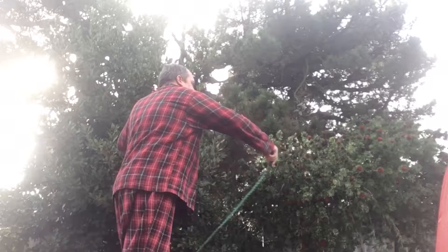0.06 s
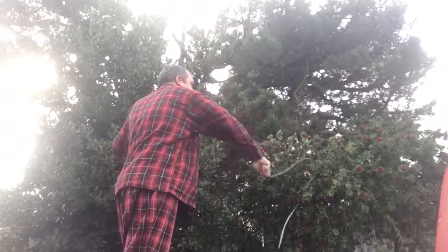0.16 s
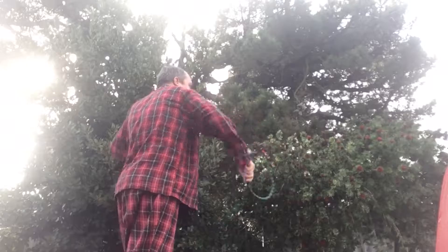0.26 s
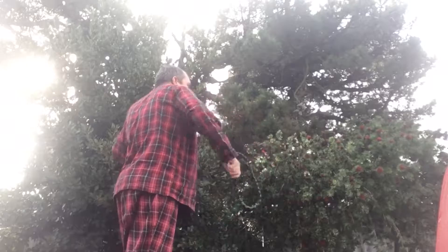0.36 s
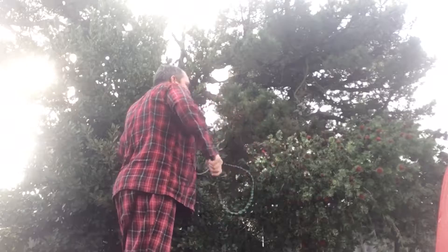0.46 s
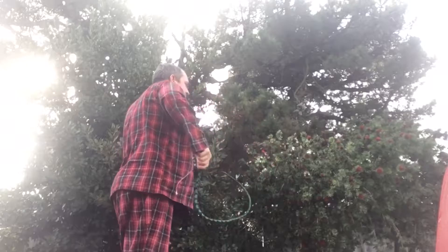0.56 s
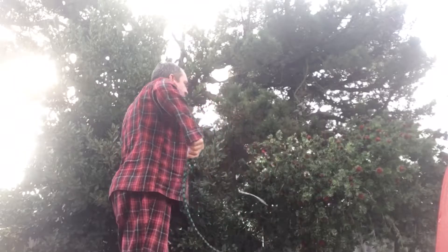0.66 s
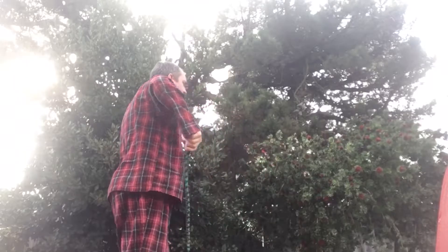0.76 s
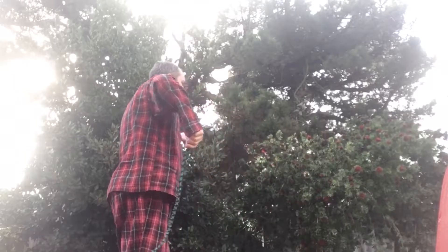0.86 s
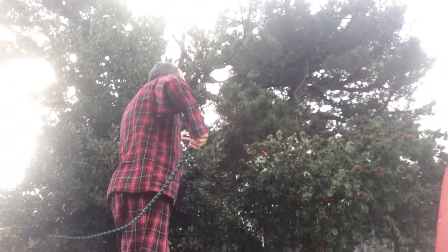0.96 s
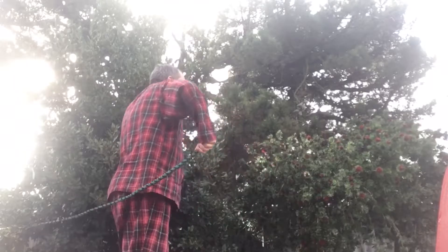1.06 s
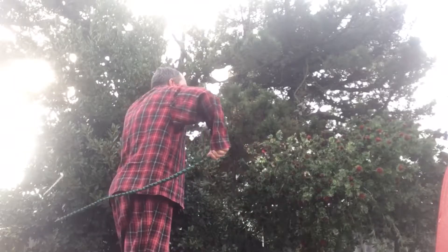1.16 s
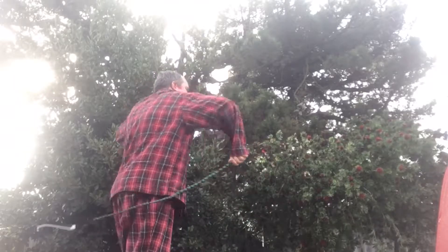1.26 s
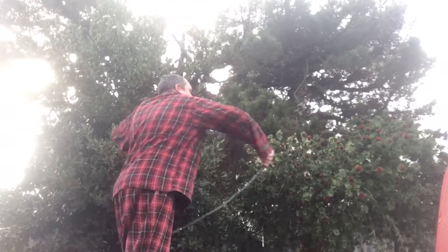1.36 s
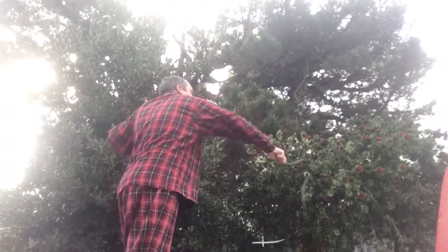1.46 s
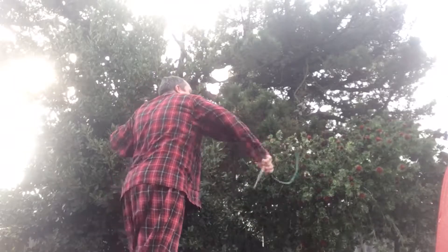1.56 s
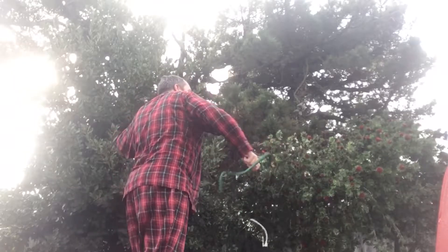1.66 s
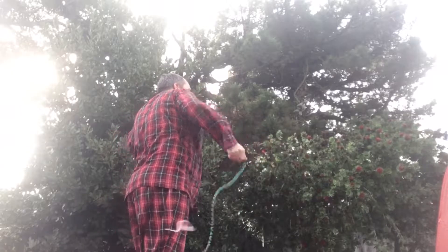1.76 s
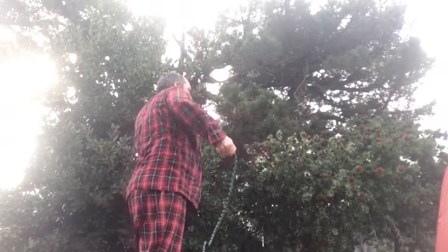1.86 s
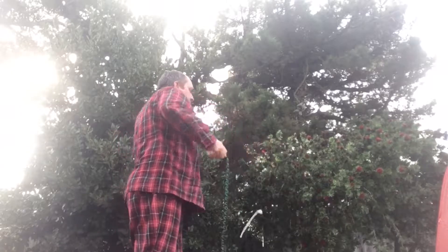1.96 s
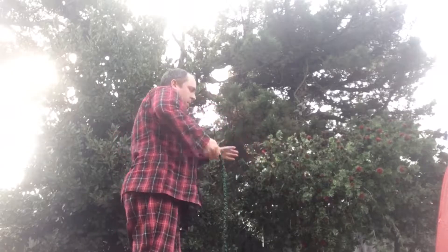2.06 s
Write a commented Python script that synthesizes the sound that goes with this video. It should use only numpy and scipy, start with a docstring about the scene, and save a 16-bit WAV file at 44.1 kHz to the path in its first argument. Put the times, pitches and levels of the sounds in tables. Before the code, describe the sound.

A long whip cracks at 0.29 s, a dense sharp snap with a wall slap 30 ms later, fluttering tree echoes and a leafy tail lasting under a second. A faint swish and tick come near 0.84 s. A louder, brighter crack follows at 1.61 s. Small lash ticks sound at 1.8-1.96 s. Beneath, soft air, rumble and an 83 Hz drone sag and fade near the end.

```python
"""A long whip cracks twice in a garden: each shock is a pressure pulse with a short, dense noise burst.
A wall slap and tree echoes repeat the pulse; foliage and far trees return decaying filtered noise.
The slack lash adds faint band-limited ticks, and the thong swishes as swelling noise bands.
Beneath lie a faint treble hiss after each crack, outdoor air, rumble, and a low sine drone,
probably a distant engine, that sags in pitch and fades towards the end."""
import sys
import numpy as np
from scipy import signal
from scipy.fft import rfft, irfft
from scipy.io import wavfile

SR = 44100
rng = np.random.default_rng(int(sys.argv[2]) if len(sys.argv) > 2 else 0)


def store_wav(level_fs):
    """Save 16-bit WAV to argv[1]."""
    pcm = np.round(np.clip(np.atleast_2d(level_fs), -1, 1) * 32767)
    wavfile.write(sys.argv[1], SR, pcm.T.astype(np.int16))


N = 94815
T = np.arange(N) / SR
CUTOFF_HZ = 16700
TILT_FROM_HZ = 1900  # brightness tilts act above this


def from_db(db):
    """Logarithmic level: decibels to amplitude gain."""
    return 10 ** (np.asarray(db) / 20)


def rms_one(x):
    """Power normalisation: scale to unit rms."""
    return x / np.sqrt(np.mean(x ** 2) + 1e-20)


def at_hz(points, hz, axis=1):
    """Logarithmic frequency scale: interpolate a table column along it."""
    rows = np.array(points)
    return np.interp(np.log(hz + 1e-9), np.log(rows[:, 0]), rows[:, axis])


def noise(colour, tilt_db=0):
    """Spectral shaping: unit-rms coloured noise, its treble tilted in dB per octave."""
    hz = np.arange(N // 2 + 1) * SR / N
    level_db = at_hz(colour, hz) + tilt_db * np.log2(np.maximum(hz, TILT_FROM_HZ))
    gain = from_db(level_db) * (hz < CUTOFF_HZ)
    white = rng.standard_normal(N)
    return rms_one(irfft(rfft(white) * gain, N))


def filtered(x, hz, kind, order=2):
    """Linear filtering: a Butterworth response."""
    edges = np.clip(hz, 10, .47 * SR)
    sections = signal.butter(order, edges, kind, fs=SR, output="sos")
    return signal.sosfilt(sections, x + 1e-18)


def band(x, hz, octaves):
    """Band limitation: a band-pass centred on a log-frequency axis."""
    half_width = 2 ** (octaves / 2)
    return filtered(x, [hz / half_width, hz * half_width], "band")


def swell(start, rise, t60, hold=0):
    """Exponential decay: a squared rise, a hold, then 60 dB of fall in t60 seconds."""
    age = T - start
    release = np.maximum(age - rise - hold, 0)
    return np.clip(age / rise, 0, 1) ** 2 * np.exp(-np.log(1000) * release / t60)


def shock(start, db, length_ms, smear_db=None, smear=None):
    """N-wave: pressure jumps up, falls linearly below rest and returns; rough surfaces smear it."""
    age = np.arange(SR // 40) / SR
    phase = 2 * age * 1000 / length_ms  # runs from 0 to 2 over the pulse
    pulse = (1 - phase) * np.clip((2 - phase) / phase[1], 0, 1)
    wave = from_db(db) * pulse
    if smear:
        # random later reflections, each carrying a copy of the pulse
        paths = rng.standard_normal(len(age)) * np.exp(-age / smear) * (phase > 2)
        paths = paths / np.linalg.norm(paths)
        wave = wave + from_db(smear_db) * np.convolve(paths, pulse)[:len(age)]
    out = np.zeros(N)
    first = int(start * SR)
    out[first:first + len(wave)] = wave
    return out


# Spectrum of the outdoor air: (frequency [Hz], relative density [dB per Hz])
AIR_COLOUR = [(76, -40.5), (130, -4.5), (172, -3.5), (202, -5.5), (228, -12.5), (394, -20), (444, -21.5),
              (863, -17.5), (1860, -31.5), (11400, -58), (16000, -55.5)]
# Spectrum of the far rumble: (frequency [Hz], relative density [dB per Hz])
RUMBLE_COLOUR = [(20, -17), (35, -5.5), (48, -5), (100, 8.5), (140, -15.5), (250, -21), (600, -47)]
AIR_DB, AIR_LOW_HZ, RUMBLE_DB = -50.5, 97, -47.5


def background():
    """Stationary random noise: soft outdoor air over a far rumble."""
    air = rms_one(filtered(noise(AIR_COLOUR), AIR_LOW_HZ, "high", order=4))
    return from_db(AIR_DB) * air + from_db(RUMBLE_DB) * noise(RUMBLE_COLOUR)


# Course of the drone: (time [s], pitch [Hz], rms level of the fundamental [dB])
DRONE_COURSE = [(0.0, 82, -46.5), (0.04, 82.6, -39), (0.27, 83.1, -30.5), (0.39, 83.1, -33),
                (0.51, 81.5, -27.5), (0.63, 83.24, -30), (0.77, 83.2, -26.5), (0.84, 82.4, -28.5),
                (1.25, 83.15, -23.5), (1.45, 82.6, -27.5), (1.55, 81.46, -28), (1.78, 79.75, -29),
                (1.89, 78.3, -29.5), (1.95, 78.5, -35.5), (2.09, 74.2, -46.5), (2.15, 75.66, -39.5)]
OCTAVE_DB = -33  # relative to the fundamental
FLUTTER_RMS = .02  # share of the amplitude


def drone():
    """Harmonic oscillation: a gliding sine with a weak octave and slight amplitude flutter."""
    s, hz, db = np.transpose(DRONE_COURSE)
    phase = 2 * np.pi * np.cumsum(np.interp(T, s, hz)) / SR
    flutter = 1 + FLUTTER_RMS * rms_one(filtered(rng.standard_normal(N), 60, "low"))
    tone = np.sin(phase) + from_db(OCTAVE_DB) * np.sin(2 * phase)
    return np.sqrt(2) * from_db(np.interp(T, s, db)) * flutter * tone


HISS_DB, HISS_HOLD_S, HISS_HZ, HISS_OCTAVES = -70, 0.413, 8000, 1.4


def hiss():
    """Gated band noise: a faint treble hiss that holds for a moment after each crack."""
    held = sum(swell(s, .01, 0.0998, HISS_HOLD_S) for s, *_ in CRACKS)
    treble = rms_one(band(rng.standard_normal(N), HISS_HZ, HISS_OCTAVES))
    return from_db(HISS_DB) * held * treble


# Sweeps of the thong through the air:
# (time of peak [s], rms level at peak [dB], centre [Hz], width [octaves], time from peak to 1/e [s])
SWISHES = [(0.249, -56, 757, 0.77, 0.015), (.24, -49, 172, .6, .05), (.835, -50, 697, .18, 0.035),
           (0.996, -60.5, 700, .2, .05), (1.536, -53.5, 236, 0.53, 0.057), (1.977, -55, 286, 1.05, 0.1)]


def swishes():
    """Aerodynamic noise: the thong's sweeps as noise bands under Gaussian swells."""
    out = np.zeros(N)
    for s, db, hz, octaves, half in SWISHES:
        envelope = np.exp(-((T - s) / half) ** 2)
        rush = rms_one(band(rng.standard_normal(N), hz, octaves))
        out += from_db(db) * envelope * rush
    return out


# Touches of the slack lash: (time [s], peak level [dB], centre [Hz], width [octaves])
TICKS = [(.8355, -38, 11400, 2.2), (.852, -53, 12170, 0.7), (1.824, -41, 7000, 3.16),
         (1.8785, -33, 755, 1.9), (1.906, -46.5, 10300, 0.87), (1.9428, -42, 8800, 0.93),
         (1.9598, -34, 6480, 0.53), (1.960, -39.5, 444, 1.1)]
TICK_DECAY_S = 0.00027  # time constant of the snap, also the rise of its wash
TICK_TAIL_DB, TICK_TAIL_T60_S = -15.5, 0.078


def ticks():
    """Impulsive excitation: each touch is a tiny band-limited snap with a faint decaying wash."""
    out = np.zeros(N)
    for s, db, hz, octaves in TICKS:
        age = np.maximum(T - s, 0)
        snap = (T >= s) * np.exp(-age / TICK_DECAY_S)
        tail = from_db(TICK_TAIL_DB) * swell(s, TICK_DECAY_S, TICK_TAIL_T60_S)
        tick = band(rng.standard_normal(N) * (snap + tail), hz, octaves)
        out += from_db(db) * tick / np.abs(tick).max()
    return out


# Reverberation of the far trees: (frequency [Hz], relative density [dB per Hz], t60 [s])
FAR_TAIL = [(150, 3, 0.28), (567, -7.5, 1), (1300, 7, 0.83), (2700, 7.5, 0.74), (4850, -7, 0.99),
            (9600, -6.5, 0.53), (15000, -21.5, 0.63)]
FAR_DB, FAR_RISE_S = -38, 0.058


def far_tail(start, bright_db):
    """Frequency-dependent reverberation: each band of the far trees' wash has its own decay."""
    edges = np.geomspace(110, 16000, 13)
    washes = [noise(FAR_TAIL, bright_db) for _ in range(2)]
    out = np.zeros(N)
    for k, (low, high) in enumerate(zip(edges, edges[1:])):
        t60 = at_hz(FAR_TAIL, np.sqrt(low * high), axis=2)
        # neighbouring bands draw on different noise
        out += filtered(washes[k % 2], [low, high], "band") * swell(start, FAR_RISE_S, t60)
    return from_db(FAR_DB) * out


# Scatter from hedges and trees:
# (delay [s], rise [s], level relative to the foliage level [dB], t60 [s], added brightness [dB per octave])
THICKETS = [(.005, .004, -0.5, 0.29, 3), (.021, .0035, 2, .17, -0.5), (0.081, .008, -11, 0.18, -0.5),
            (0.108, 0.0073, -17.5, .17, -1)]
# Spectrum of the scatter: (frequency [Hz], relative density [dB per Hz])
LEAF_COLOUR = [(40, -25.5), (100, -7.5), (190, 3.5), (500, -1), (1000, -7), (2800, 2), (4500, -1.5),
               (7000, -1.5), (10000, -7), (15000, -17)]


def foliage(start, bright_db):
    """Diffuse scattering: each thicket throws back countless small reflections as decaying noise."""
    out = np.zeros(N)
    for delay, rise, db, t60, tilt_db in THICKETS:
        wash = noise(LEAF_COLOUR, bright_db + tilt_db)
        out += from_db(db) * wash * swell(start + delay, rise, t60)
    return out


# Echoes from trees, levels relative to the crack's tree echo level and before filtering:
# (delay [s], pulse level [dB], smear level [dB], smear time constant [s])
ECHOES = [(.0432, -16.5, -7.5, .003), (.054, -14, -30, .003), (.0815, -23, -16, 0.0028),
          (.0892, -15, 2, .002), (.093, -10.5, -10.5, 0.0022), (.111, -29, -18, 0.0032),
          (.1181, -16, -2, 0.0014), (.151, -21, -23, 0.0031), (.169, -33, -40, .003),
          (.211, -34, -16.5, .004)]
ECHO_LOW_HZ, ECHO_PULSE_MS = 1100, 0.31


def echoes(start, top_hz):
    """Discrete reflection: trees return delayed, smeared copies, band-limited to sound thin and dull."""
    out = np.zeros(N)
    for delay, db, smear_db, smear in ECHOES:
        out += shock(start + delay, db, ECHO_PULSE_MS, smear_db, smear)
    dulled = filtered(out, top_hz, "low", order=4)
    return filtered(dulled, ECHO_LOW_HZ, "high")


WALL_DELAY_S, WALL_TOP_HZ = .0322, 4500
WALL_SMEAR_DB, WALL_SMEAR_S = -11, 0.0011  # level relative to the pulse, time constant


def wall_slap(start, length_ms):
    """Specular reflection: the hard echo of the pulse from a nearby wall."""
    bounce = shock(start + WALL_DELAY_S, 0, length_ms, WALL_SMEAR_DB, WALL_SMEAR_S)
    return filtered(bounce, WALL_TOP_HZ, "low")


BURST_HOLD_S, BURST_T60_S = .001, .028
BURST_ROUGH = .35  # exponent on the spectral magnitudes: 0 smooth, 1 fully random
BURST_LENGTH_S = .025  # full until here, faded out at twice this age


def burst(start, rise, colour):
    """Multipath smearing: nearby surfaces spread the shock but keep most of its smooth spectrum."""
    shape = swell(start, rise, BURST_T60_S, BURST_HOLD_S)
    spray = rfft(rng.standard_normal(N) * shape)
    spray *= (np.abs(spray) + 1e-9) ** (BURST_ROUGH - 1)  # evens out the magnitudes, keeps the phases
    spray *= from_db(at_hz(colour, np.arange(len(spray)) * SR / N))
    age = T - start
    fade_in = np.clip(age / rise * 2, 0, 1)
    fade_out = np.clip(2 - age / BURST_LENGTH_S, 0, 1)
    out = irfft(spray, N) * fade_in * fade_out
    return out * np.linalg.norm(shape) / np.linalg.norm(out)


# Cracks, pulse levels before filtering: (time [s], level of direct sound [dB], burst rise [s],
# direct pulse level relative to that [dB], wall slap level [dB], slap pulse length [ms],
# tree echo level [dB], tree echo top [Hz], foliage level [dB], foliage and far tail brightness [dB per octave])
CRACKS = [(0.2897, -12.5, 0.0033, -7, -5, 0.46, -11, 3280, -24, -4.16),
          (1.6121, -9, 0.0043, -1, -6.5, 0.37, -11, 4250, -21.5, 0.66)]
# Burst spectrum, one list per crack: (frequency [Hz], relative density [dB per Hz])
CRACK_COLOURS = [
    [(60, -4.5), (200, 5.5), (400, -6), (750, -10), (1200, -9), (1650, -3), (2100, -8.5), (2600, -3),
     (3600, -13.5), (4700, -14), (6700, -1.5), (8400, -15), (9700, -7.5), (10600, -12), (12800, -7),
     (16000, -23)],
    [(60, -2.5), (230, 3), (480, -17.5), (870, 0), (1170, -14.5), (1600, 2.5), (2100, -13.5), (2650, -5),
     (3100, -13.5), (4000, -7), (4850, -16), (5500, -8), (7700, 0.5), (8700, -7.5), (12300, -5.5),
     (16000, -14.5)],
]
SHOCK_DELAY_S, SHOCK_MS, SHOCK_TOP_HZ = .0022, 0.76, 2500  # the direct pressure pulse
FAR_GRAIN_DB, FAR_GRAIN_HZ = 2, 110  # rms depth and top rate of the far tail's level flicker


def whip():
    """Superposition: direct shock, early reflections and late scatter add for each crack."""
    out = np.zeros(N)
    for crack, colour in zip(CRACKS, CRACK_COLOURS):
        s, db, rise, direct_db, slap_db, slap_ms, echo_db, echo_hz, leaf_db, bright_db = crack
        flicker = rms_one(filtered(rng.standard_normal(N), FAR_GRAIN_HZ, "low"))
        grain = from_db(FAR_GRAIN_DB * flicker)
        direct = filtered(shock(s + SHOCK_DELAY_S, direct_db, SHOCK_MS), SHOCK_TOP_HZ, "low")
        out += from_db(db) * (direct + burst(s, rise, colour))
        out += from_db(slap_db) * wall_slap(s, slap_ms)
        out += from_db(echo_db) * echoes(s, echo_hz)
        out += from_db(leaf_db) * foliage(s, bright_db)
        out += grain * far_tail(s, bright_db)
    return out


def scene():
    """Linear superposition: all sources sum at one microphone."""
    return (background() + drone() + hiss() + swishes() + ticks() + whip())[None]


def record(dry):
    """Band limitation: a steep low-pass cuts the top."""
    sections = signal.cheby2(16, 70, CUTOFF_HZ, fs=SR, output="sos")
    return signal.sosfilt(sections, dry)


dry = scene()
out = record(dry)
store_wav(out)
```